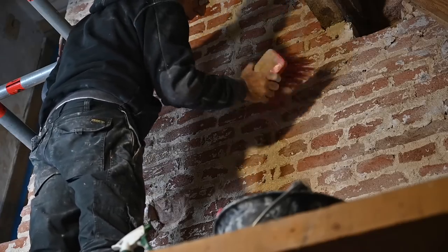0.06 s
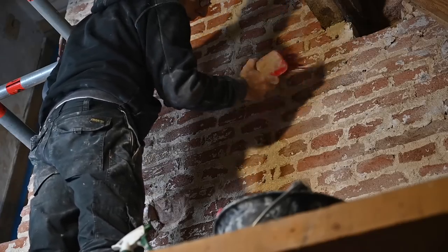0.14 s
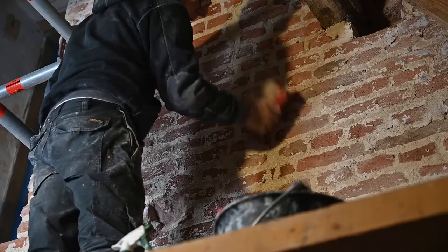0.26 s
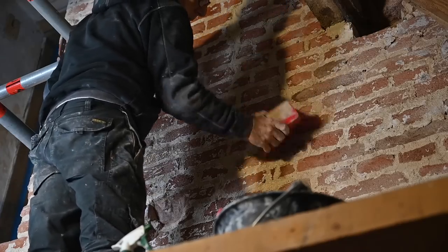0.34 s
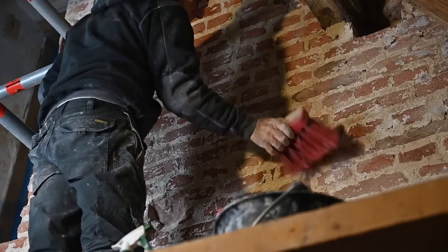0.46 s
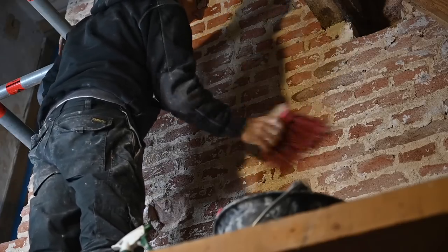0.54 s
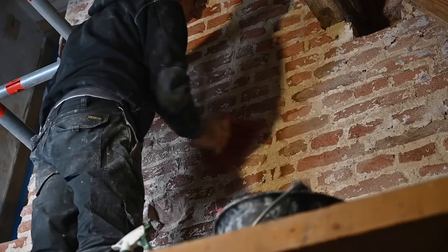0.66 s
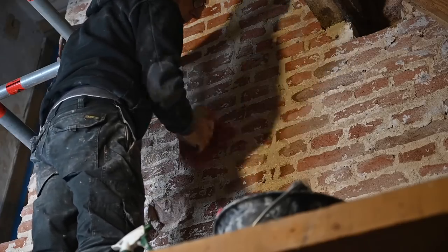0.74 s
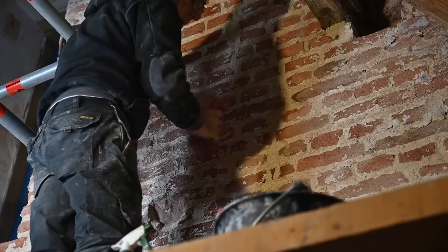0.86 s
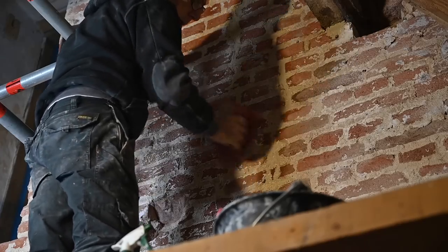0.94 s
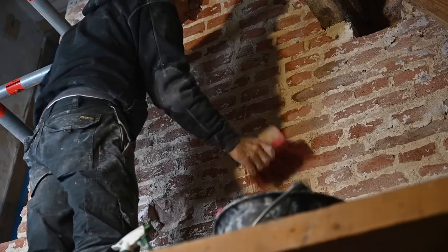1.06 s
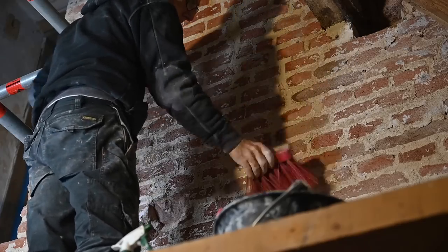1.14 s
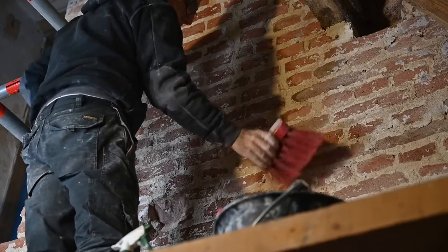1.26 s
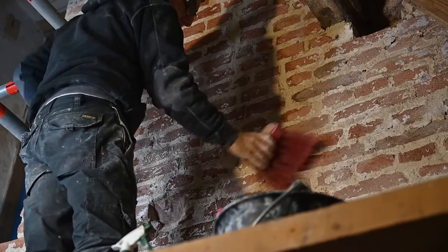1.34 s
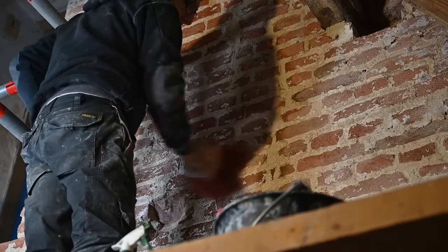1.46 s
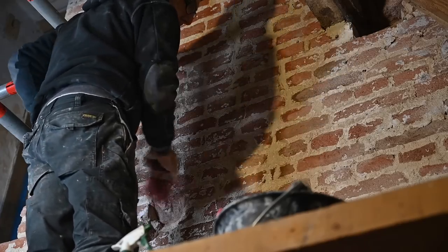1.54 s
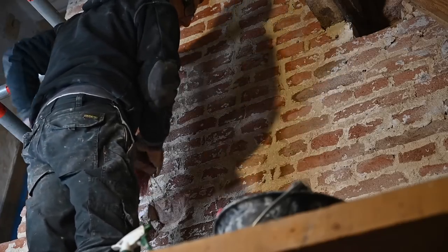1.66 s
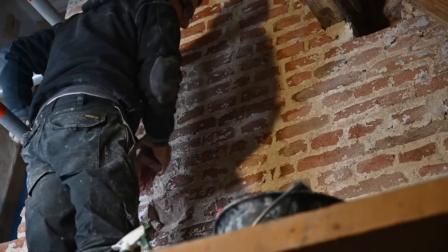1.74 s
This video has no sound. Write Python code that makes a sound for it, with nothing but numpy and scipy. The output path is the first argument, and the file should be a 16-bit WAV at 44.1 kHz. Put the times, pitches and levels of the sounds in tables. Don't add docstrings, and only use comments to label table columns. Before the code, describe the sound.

Stiff hand brush scrubbing mortar on a brick wall, four scratchy back-and-forth strokes with short pauses

```python
import sys
import numpy as np
from scipy import signal
from scipy.fft import rfft, irfft, next_fast_len
from scipy.io import wavfile
from scipy.ndimage import uniform_filter1d, map_coordinates

SR = 44100
rng = np.random.default_rng(int(sys.argv[2]) if len(sys.argv) > 2 else 0)


def voltage_ratio(decibels):
    exponent = np.asarray(decibels, float) / 20
    return 10 ** exponent


def transcribe(signal):
    frames = np.atleast_2d(signal).T
    limited = np.clip(frames, -1, 1)
    pcm = np.round(limited * 32767).astype(np.int16)
    wavfile.write(sys.argv[1], SR, pcm)


N = 79380
T = np.arange(N) / SR


def unit(x):
    return x / np.sqrt(np.mean(x ** 2) + 1e-20)


def along(points, hz):
    f, v = np.transpose(points)
    return np.interp(np.log(hz + 1), np.log(f + 1), v)


def wobble(rate):
    return map_coordinates(rng.standard_normal(int(N * rate / SR) + 4), [T * rate])


def coloured(x, shape_db):
    size = 2 * next_fast_len(N // 2 + 4096)
    gain = voltage_ratio(shape_db(np.fft.rfftfreq(size, 1 / SR)))
    cepstrum = irfft(np.log(np.maximum(gain, 1e-5)), size)
    cepstrum[1:size // 2] *= 2
    cepstrum[size // 2 + 1:] = 0
    return irfft(rfft(x, size) * np.exp(rfft(cepstrum)), size)[..., :N]


def shaped_noise(points):
    return unit(coloured(rng.standard_normal(N), lambda f: along(points, f)))


def bump(f, hz, width, db):
    return db / (1 + (2 * (f - hz) / width) ** 2)


def grit(rate, spread_db):
    happens = rng.random(N) < rate / SR
    sign = rng.standard_normal(N)
    size_db = spread_db * rng.exponential(size=N)
    return unit(happens * sign * voltage_ratio(size_db))


def patchy(x, patchy_db, hz_bins=5, frames=6):
    z = signal.stft(x, nperseg=256)[2]
    field = uniform_filter1d(rng.standard_normal(z.shape), hz_bins, 0)
    field = uniform_filter1d(field, frames, 1)
    return signal.istft(z * voltage_ratio(patchy_db * unit(field)), nperseg=256)[1][:N]


def hum():
    # frequency [Hz], density [dB per Hz].
    hum_colour = [(35, -53), (62, -19), (97, -3.5), (125, -6.5), (215, -4.5), (293, -5), (420, -11),
                  (685, -8), (2000, -22.5), (2600, -55), (4400, -120)]
    # time [s], swell [dB].
    swell = [(0, 2), (.2, 9), (.3, 10), (.4, 0), (.52, -0.5), (.85, 9.5), (1.2, 6.5), (1.6, 4.5),
             (1.8, 1.5)]
    level_db = -64 + np.interp(T, *np.transpose(swell))
    murmur = patchy(rng.standard_normal(N), patchy_db=0.5, frames=20)
    return voltage_ratio(level_db) * unit(coloured(murmur, lambda f: along(hum_colour, f)))


def far_scrape():
    # start [s], length [s], level [dB], resonance [Hz], width [Hz].
    far_strokes = [(0.127, 0.16, -55.5, 1150, 380), (0.784, 0.033, -54.5, 1230, 170),
                   (0.825, 0.056, -56, 1233, 170), (1.133, 0.085, -57, 1235, 70.4),
                   (1.197, 0.024, -56, 1254, 60), (1.267, 0.066, -57.5, 1280, 55),
                   (1.367, 0.1, -49, 1137, 70), (1.491, .04, -57, 1090, 60), (1.539, 0.036, -52, 1118, 40),
                   (1.582, 0.12, -61.5, 1133, 70)]
    rise_s, fall_s = 0.015, 0.018
    steadiness = 0.8
    out = np.zeros(N)
    for s, length, db, hz, width in far_strokes:
        fade_in = np.clip((T - s) / rise_s, 0, 1)
        fade_out = np.exp(-np.clip(T - s - length, 0, None) / fall_s)
        hollow = lambda f: -18 * np.log10(1 + ((f - hz / f.clip(1) * hz) / width) ** 2)
        rub = unit(coloured(rng.standard_normal(N), hollow))
        envelope = uniform_filter1d(np.abs(signal.hilbert(rub)), size=200)
        out += voltage_ratio(db) * fade_in * fade_out * unit(rub / (envelope + 0.056) ** steadiness)
    return out


def sand(effort):
    # frequency [Hz], density [dB per Hz].
    sand_colour = [(880, -34), (1500, -13.5), (2140, -12), (3220, -6.5), (5660, -6), (11900, -16.5),
                   (16000, -36)]
    level_db, t60_s, grains_per_s = -23, 0.6, 1400
    fall = voltage_ratio(-120 * T / t60_s)
    flow = np.sqrt(np.abs(signal.fftconvolve(effort ** 2, fall / fall.sum())[:N]))
    grains = grit(grains_per_s, 1.5) + 1.2 * rng.standard_normal(N)
    trickle = unit(coloured(grains, lambda f: along(sand_colour, f)))
    return voltage_ratio(level_db + 2.6 * wobble(29.86)) * flow * trickle


def chip():
    # frequency [Hz], level [dB].
    chip_modes = [(2000, -5), (2850, -6), (4550, 0), (5300, 2), (7100, -1), (9000, -6), (11000, -9),
                  (14000, -9)]
    start_s, level_db, t60_s = 0.8221, -30.5, 0.011
    t = np.clip(T - start_s, 0, None)
    ring = sum(voltage_ratio(db) * np.sin(2 * np.pi * (hz * t + rng.random())) for hz, db in chip_modes)
    return voltage_ratio(level_db - 60 * t / t60_s) * (1 - np.exp(-t / 0.00074)) * ring


def ticks():
    # time [s], peak [dB], centre [Hz], relative width [1], relative length [1].
    snaps = [(.044, -46, 7000, 1.2, .5), (0.0762, -45, 9000, 1.3, .5), (.0884, -44, 7000, 1.3, .5),
             (0.1023, -41, 8500, 1.3, .6), (.118, -47, 9550, 0.84, .5), (.1305, -47, 8500, 1.4, .5),
             (.151, -52, 11000, 1.1, 0.36), (.167, -45, 8000, 1.7, .8), (.8172, -34, 4500, .6, 1.1),
             (0.8227, -29, 7000, 1.6, .8), (.8544, -43, 7700, .25, .5), (0.942, -13.5, 5200, 1.15, .5),
             (1.187, -39, 4500, 0.46, 2.3), (1.218, -48, 7000, .5, 1.1), (1.2535, -36, 6300, 0.8, 1.5),
             (1.2848, -40.5, 4800, 0.68, 1.3), (1.3344, -46, 7500, 0.87, .9),
             (1.6373, -36.5, 4770, 0.68, 1.1)]
    # time [s], peak [dB], centre [Hz], width [1], length [1].
    first_touch = [
        (.2185, -19, 6000, 1.1, .22),
        (.2222, -22, 6500, 1.2, .8),
    ]
    t60_s, level_db, width_hz = 0.014, -3, 7500
    out, t = np.zeros(N + SR), T[:SR // 5]
    f = np.fft.rfftfreq(len(t), 1 / SR)
    for s, db, hz, wide, long in snaps + first_touch:
        width = wide * width_hz
        band = (f * width / (hz ** 2 - f ** 2 + 1j * f * width)) ** 2
        crack = unit(irfft(rfft(rng.standard_normal(len(t))) * band, len(t)))
        attack = 1 - np.exp(-t / (long * 0.00044))
        snap = voltage_ratio(-60 * t / (long * t60_s)) * crack * attack
        out[round(s * SR):][:len(t)] += voltage_ratio(db + level_db) * snap / np.abs(snap).max()
    return out[:N]


def thuds():
    # time [s], level [dB], pitch factor [1], push into the wall [dB].
    hits = [
        (.229, -38.5, 0.965, -62),
        (.27, -53, 0.53, -62),
        (.3, -55.5, 0.5, -62),
        (.562, -51, 1.05, -49.5),
        (.932, -38, 1.08, -60),
        (1.372, -54, 0.88, -56),
    ]
    # mode of the wooden back [Hz], level [dB], decay t60 [s].
    back_modes = [(463, 1, 0.12), (549, -2, 0.11), (610, 2.5, 0.13), (689, -4, 0.16), (792, -3, 0.098),
                  (970, -2, 0.068)]
    wall_hz, wall_db, wall_t60_s = 75.4, 4, 0.05
    out, t = np.zeros(N + SR), T[:SR // 5]
    for s, db, pitch, push_db in hits:
        ring = voltage_ratio(push_db + wall_db - 60 * t / wall_t60_s) * np.sin(2 * np.pi * wall_hz * t)
        for hz, mode_db, t60 in back_modes:
            phase = rng.uniform(0, 2 * np.pi)
            ring += voltage_ratio(db + mode_db - 60 * t / t60) * np.sin(2 * np.pi * pitch * hz * t + phase)
        out[round(s * SR):][:len(t)] += ring * (1 - np.exp(-t / 0.0046))
    return out[:N]


def pressure(strokes):
    lift_db_per_s = 404
    gain, dull = np.zeros(N), np.zeros(N)
    for rows in strokes:
        s, db, d = np.transpose(rows)
        lift_db = lift_db_per_s * np.clip(T - s[-1], 0, None)
        gain += voltage_ratio(np.interp(T, s, db, -120) - lift_db)
        dull = np.where(T >= s[0], np.clip(np.interp(T, s, d), 0, 1), dull)
    return gain, dull


def bent(x):
    # time [s], band centre [Hz], band boost [dB], air of the tips [dB].
    bends = [
        [(.22, 6500, 0, -0.5), (.26, 6000, -4, -0.5), (.285, 7240, 3.5, 2), (.34, 7000, 2, 3),
         (.385, 5000, 0, 0), (.41, 5000, 3, 0)],
        [(.55, 4870, 1, 0.5), (.572, 4650, 6.5, -0.5), (.595, 4800, 0, 0), (.635, 4300, 0, -0.5),
         (.66, 3400, 6, 0.5), (.7, 4930, 3.5, 0.5), (.75, 4150, 4.5, -3.5), (.8, 4000, 1, -5)],
        [(.914, 4000, 8, -1), (.93, 4100, 6, -2), (.94, 4900, 4, -5.5), (.97, 6200, 1, 0.5),
         (1.02, 6600, 0.5, 2.5), (1.09, 4200, 2.5, 2), (1.12, 4800, 2, 2)],
        [(1.355, 4300, 3, 3), (1.372, 4650, 8, 3.5), (1.408, 4700, 7, 1), (1.425, 3900, 3, 1.5),
         (1.455, 3320, 4, 3), (1.495, 3070, 8, 0), (1.52, 3470, 1, 1.5), (1.57, 3500, 7, 0)],
    ]
    band_width_hz, air_hz = 660, 7000
    hz, t, z = signal.stft(x, SR, nperseg=256)
    hz = hz[:, None]
    s, centre, boost_db, air_db = np.transpose(sum(bends, []))
    gain_db = bump(hz, np.interp(t, s, centre), band_width_hz, np.interp(t, s, boost_db))
    gain_db += np.interp(t, s, air_db) / (1 + (air_hz / (hz + 1)) ** 6)
    shaped = z * voltage_ratio(gain_db)
    power_before = uniform_filter1d(np.sum(np.abs(z) ** 2, 0), size=9)
    power_after = uniform_filter1d(np.sum(np.abs(shaped) ** 2, 0), size=9)
    return signal.istft(shaped * np.sqrt(power_before / power_after), nperseg=256)[1][:N]


def brush():
    # time [s], pressure [dB], dullness as the bristles lie down [0-1].
    push_strokes = [
        [(.2175, -65, .4), (.2205, -43, 0), (.2295, -38, 0), (.2345, -29, 0), (.256, -24.5, 0.1),
         (.344, -19.5, 0.55), (.368, -21.5, 0.64), (.396, -42.5, 0.5), (.41, -42.5, 0.5)],
        [(.913, -65, .2), (.9155, -45, 0.1), (.929, -45, 0.2), (.934, -35.5, 0.5), (.965, -24, 0.62),
         (1.015, -20, 0.4), (1.078, -23.5, 0.72), (1.1, -36.5, 0.5), (1.12, -46, 0.4)],
    ]
    # time [s], pressure [dB], dullness [0-1].
    pull_strokes = [
        [(.546, -56, .3), (.558, -26.5, 0.17), (.568, -16.5, 0.21), (.576, -21, 0.097), (.665, -20.5, 0.56),
         (.7, -25.5, 0.34), (.753, -30, 0.72), (.81, -50, 0.35)],
        [(1.352, -81, .5), (1.36, -44, 0.45), (1.376, -23.5, 0.24), (1.402, -20, 0.091), (1.476, -21, 0.61),
         (1.518, -30, 0.34), (1.555, -42, 0.96), (1.58, -60, .4)],
    ]
    # frequency [Hz], density [dB per Hz].
    push_colour = [(180, -72.5), (300, -24), (526, -16), (1420, -17.5), (1880, -10.5), (4020, -5.5),
                   (5240, -7.5), (6080, -1.5), (15600, -16.5)]
    # frequency [Hz], density [dB per Hz].
    pull_colour = [(180, -52), (300, -25), (631, -21), (1370, -18), (2040, -14.5), (3090, -10), (5330, -2),
                   (8890, -5.5), (15600, -18)]
    # frequency [Hz], density [dB per Hz].
    flat_colour = [(180, -64), (300, -26), (1130, -15.5), (1490, -23.5), (2490, -15), (3300, 0),
                   (5980, -3.5), (11000, -8.5), (15600, -18)]
    # centre [Hz], width [Hz], boost [dB].
    tufts = [(580, 83, 6.5), (1090, 210, 1.5), (1910, 570, 4.5), (3450, 870, -2.5), (5070, 700, -0.5),
             (7000, 2000, 2.5)]
    # centre [Hz], width [Hz], depth [dB].
    wall_notch = (1600, 110, -6.5)
    slips_per_s, slip_spread_db = 14000, 0.5
    smooth_share = 0.7

    slips = np.sqrt(1 - smooth_share) * grit(slips_per_s, slip_spread_db)
    slips += np.sqrt(smooth_share) * rng.standard_normal(N)
    flutter_db = 0.58 * wobble(59.53) + 0.39 * wobble(220)
    slips = patchy(slips, patchy_db=1.07, hz_bins=4, frames=4) * voltage_ratio(flutter_db)

    def tone(colour):
        body = lambda f: sum(bump(f, *tuft) for tuft in tufts) + bump(f, *wall_notch)
        return unit(coloured(slips, lambda f: along(colour, f) + body(f)))

    flat = tone(flat_colour)
    push, push_dull = pressure(push_strokes)
    pull, pull_dull = pressure(pull_strokes)
    push_tone = (1 - push_dull) * tone(push_colour) + push_dull * flat
    pull_tone = (1 - pull_dull) * tone(pull_colour) + pull_dull * flat
    return push * bent(push_tone) + pull * bent(pull_tone), push + pull


def room(x):
    # frequency [Hz], decay t60 [s].
    decay = [(300, .5), (2000, 0.23), (6000, 0.46), (14000, 0.39)]
    hz, t, z = signal.stft(rng.standard_normal(SR // 2), SR, nperseg=256)
    dying = z * voltage_ratio(-60 * t / along(decay, hz)[:, None])
    tail = signal.istft(dying, SR, nperseg=256)[1]
    delayed = np.pad(x, (300, 0))
    return signal.fftconvolve(delayed, tail / np.linalg.norm(tail))[:N]


def scene():
    strokes, effort = brush()
    near = strokes + thuds() + ticks() + chip()
    mid = near + voltage_ratio(-22.5) * room(near) + sand(effort) + far_scrape() + hum()
    side = voltage_ratio(-48.5) * np.roll(mid, 37)
    return np.array([mid + side, mid - side])


def low_pass(x):
    return signal.sosfilt(signal.butter(12, 16660, fs=SR, output="sos"), x)


def record(dry):
    # frequency [Hz], density [dB per Hz].
    shared_hiss = [(30, -15), (100, -10.5), (400, 9.5), (1500, -7.5), (5500, -2.5), (10000, -9),
                   (16000, -14)]
    # frequency [Hz], density [dB per Hz].
    apart_hiss = [(30, -6), (500, -9.5), (3000, -15), (6000, -23), (11000, -36), (13500, -6.5), (16000, -1)]
    low_cut_hz, top_hz = 50, 15820
    mid_hiss = voltage_ratio(-58.5) * shaped_noise(shared_hiss)
    side_hiss = voltage_ratio(-67.5) * shaped_noise(apart_hiss)
    noisy = dry + mid_hiss + side_hiss * [[1], [-1]]

    def band_db(f):
        low_cut_db = -10 * np.log10(1 + (low_cut_hz / f.clip(1)) ** 4)
        return low_cut_db - np.clip((f - top_hz) / 2, 0, 90)

    return low_pass(np.array([coloured(x, band_db) for x in noisy]))


dry = scene()
out = record(dry)
transcribe(out)
```